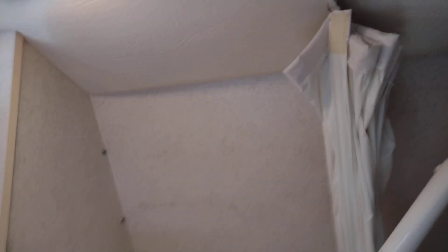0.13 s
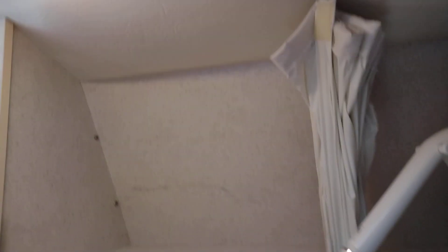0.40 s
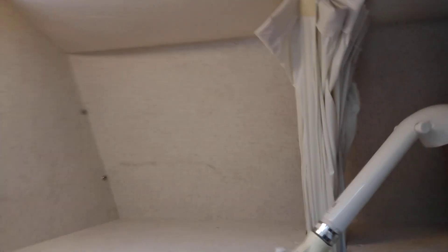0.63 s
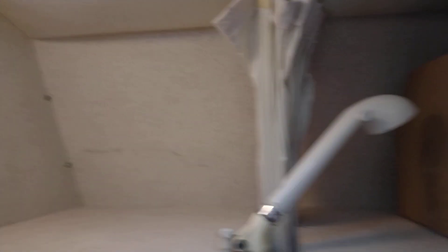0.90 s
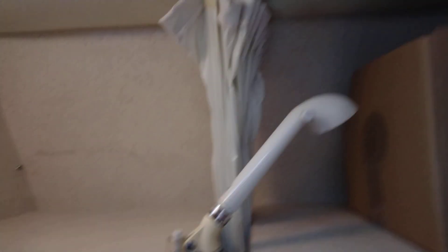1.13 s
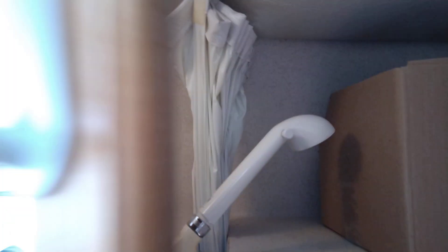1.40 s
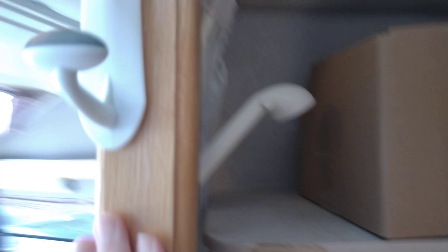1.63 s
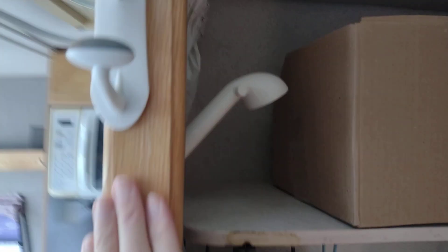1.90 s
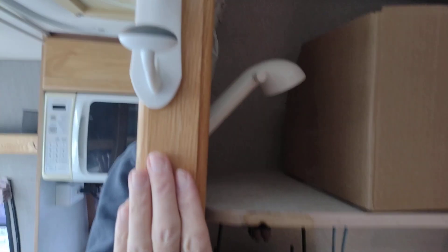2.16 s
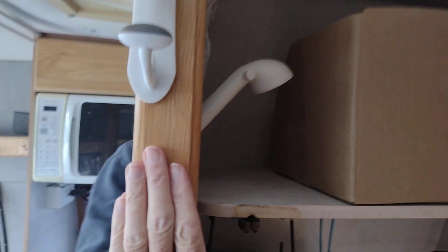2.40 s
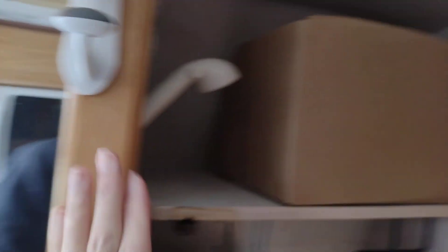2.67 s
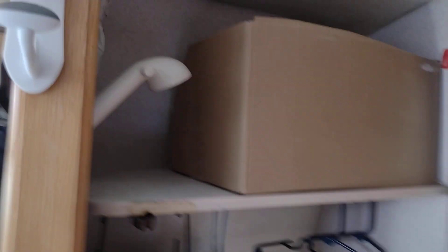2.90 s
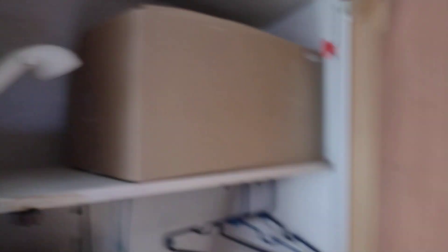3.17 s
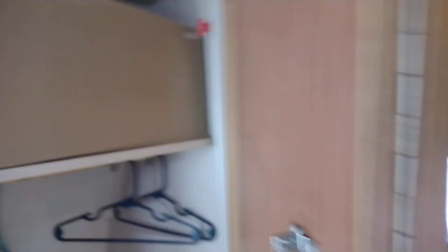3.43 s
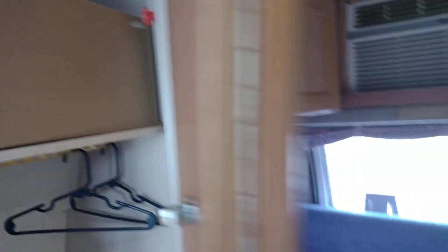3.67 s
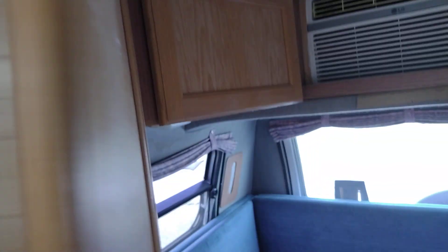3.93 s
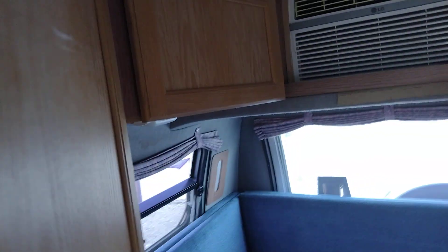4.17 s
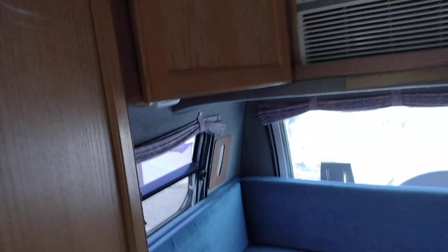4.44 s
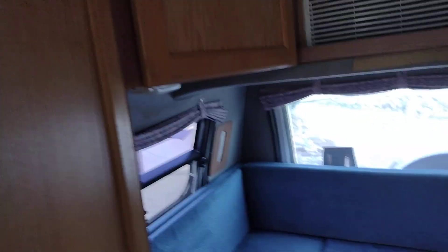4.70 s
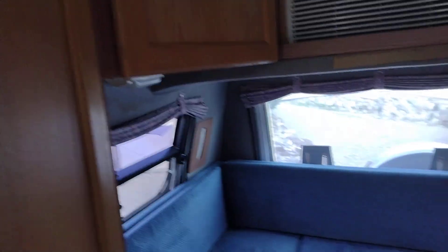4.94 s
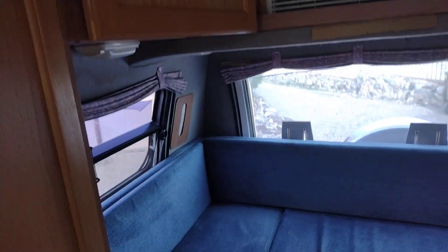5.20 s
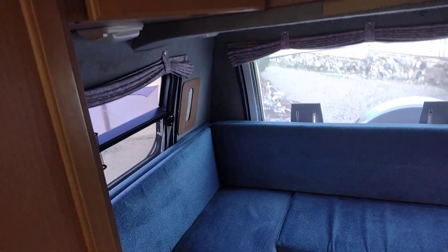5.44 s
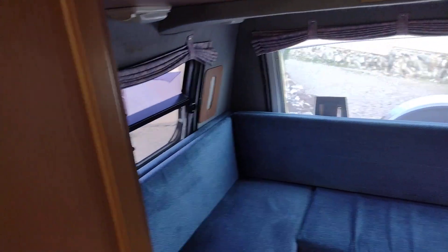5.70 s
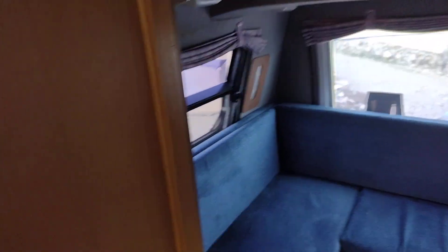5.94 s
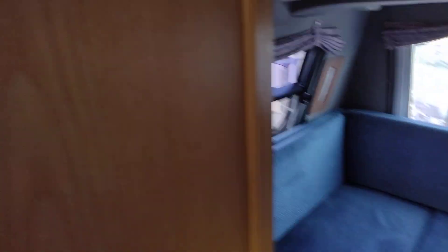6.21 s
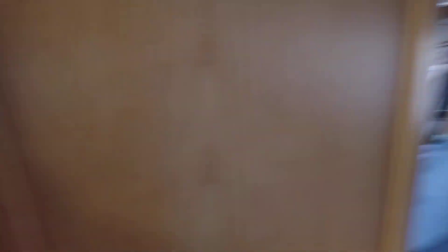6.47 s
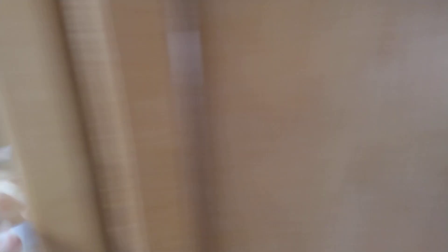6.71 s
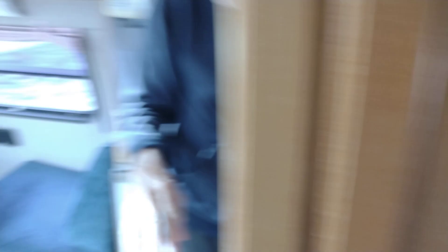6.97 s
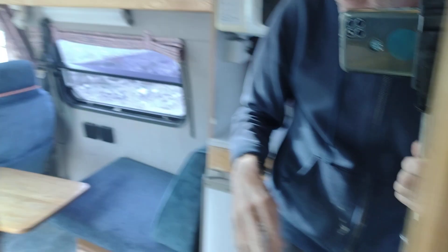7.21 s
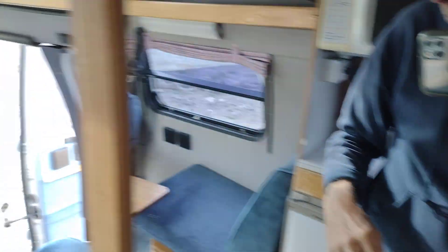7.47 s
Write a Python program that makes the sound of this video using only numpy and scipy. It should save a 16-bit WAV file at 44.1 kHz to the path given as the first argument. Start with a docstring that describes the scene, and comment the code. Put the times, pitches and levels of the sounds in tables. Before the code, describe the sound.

Hands work thin wooden cabinet doors at close range in a cramped, dry van interior. Scattered taps and scuffs build to a rattling slam, ease, and return as muted bumps with rustling cloth. A second hard knock with low thuds comes late, followed by smaller bumps and a soft swish. Finally only faint hiss, hum, small touches and rising bird whistles outside remain.

```python
"""Knocks on wooden cabinet doors, catches and hinges, close by, inside a small, soft-lined camper van.
Each knock rings the thin panels (decaying sines) and rattles loose fittings (bursts of coloured noise); low
thumps are swelling sines. Hands and sleeves rub and rustle as shaped noise, a door swishes past, and a faint
hum and the gliding whistles of a far bird fill the pauses.
Two spaced microphones hear it, the left one a little earlier."""
import sys
import numpy as np
from scipy import signal
from scipy.fft import rfft, irfft, next_fast_len
from scipy.io import wavfile
from scipy.ndimage import uniform_filter1d, map_coordinates

SR = 44100
rng = np.random.default_rng(int(sys.argv[2]) if len(sys.argv) > 2 else 0)


def undo_db(level):
    """Turn decibels back into plain size, where 20 dB means ten times bigger."""
    steps = np.asarray(level, float) / 20
    return 10 ** steps


def master(y):
    """Save y as 16-bit WAV."""
    cut = np.clip(np.atleast_2d(y).T, -1, 1)
    pcm = np.round(cut * 32767)  # scale
    wavfile.write(sys.argv[1], SR, pcm.astype(np.int16))


N = 335160

# Levels in these tables stand ahead of each source's own gain; density is the noise level per Hz.
# Background hiss and rumble: (frequency [Hz], density [dB])
FLOOR_COLOUR = [(22, -8.5), (40, 1.5), (200, -5.0), (2500, -20), (5000, -17.0), (16000, -54.5)]
# Faint hum, one list for each stretch where it shows: (time [s], level [dB])
HUM_SPANS = [
    [(5.25, -107), (5.314, -84), (5.584, -65), (5.59, -68)],
    [(6.75, -107), (6.776, -92.5), (6.836, -64.5), (6.998, -68), (7.05, -100), (7.12, -100), (7.145, -66),
     (7.544, -73), (7.6, -86.5)],
]
# Far bird, one row a whistle: (time [s], length [s], from [Hz], towards [Hz], level [dB])
CHIRPS = [(6.98, .075, 1800, 3320, -71), (7.104, .075, 2250, 4750, -67), (7.262, .055, 2150, 3800, -71)]
# Place of the close sources between the microphones: (time [s], right lag [ms], left over right in knocks [dB])
PLACE = [(0, 0.27, 1.5), (.5, .37, -3), (1.4, 0.5, 19.5), (1.5, 0.13, 0.5), (2.5, 0.11, -3), (3.2, 0.15, 3),
         (3.9, 0.25, 2), (4.1, 0.42, 4), (5.2, 0.47, 4), (5.6, .33, 2), (7.6, 0.23, 2.5)]
# Sleeves and hands on cloth: (crest time [s], level [dB], 20 dB rise [s], 20 dB fall [s],
# upper over lower half [dB]); very short or negative rises and falls take the least that stroke() allows
CLOTH_STROKES = [(0.0, -67.5, .02, 0.1, -7), (0.054, -63, -5, -7.6, -1), (0.414, -59, 0.25, -0.54, -15),
                 (0.548, -58.5, 0.35, -0.1, -7), (0.74, -63, 0.07, 0.5, -10), (0.809, -58, -0.05, 0.41, 1),
                 (0.962, -47.5, 0.03, -0.28, 1), (1.075, -60.5, 0.84, 0.2, -3), (1.208, -64, .1, .08, -5),
                 (1.37, -60, .28, .09, -3), (3.61, -60, 0.02, 0.17, -6), (3.66, -58.5, 0.11, -0.33, -10),
                 (3.906, -78.5, 0.86, 2.1, -14), (4.085, -52.5, 0.08, -0.06, 11.5),
                 (4.365, -65, 0.23, 0.2, 6.5), (4.505, -61.5, 0.03, 0.15, 11),
                 (4.655, -60.5, 0.2, -0.09, -4.5), (4.761, -66, -0.06, .09, 3.5),
                 (4.92, -57, 0.05, -0.09, 6), (5.091, -67.5, -0.47, 0.2, 9.5), (5.21, -65, 0.32, -0.34, 12),
                 (5.41, -83.5, 1.2, 0.65, 8.5), (5.63, -79, -0.7, 1.7, 3), (6.31, -77, -0.64, 0.1, 8),
                 (6.475, -64, 0.06, 0.22, 11), (6.619, -56.5, 0.05, 0.07, 6), (6.83, -63.5, -1.24, 0.04, 4),
                 (7.199, -84.5, 0.44, 0.6, 3.5)]
# Colour of the cloth: (frequency [Hz], density [dB])
CLOTH_COLOUR = [(1760, -10), (3000, -9.5), (4570, -6.5), (7750, -8.5), (8380, -4.5), (14000, -7),
                (15900, -13.5), (16500, -36)]
# Fingers sliding over wood: (crest time [s], level [dB], 20 dB rise [s], 20 dB fall [s], resonance [Hz])
SCUFF_STROKES = [(0.506, -46.5, .008, .012, 1330), (0.568, -51.5, .014, .05, 870),
                 (0.63, -62, .06, .1, 600), (0.71, -60, .12, .04, 400), (1.33, -71, .05, .1, 600),
                 (1.39, -67, .15, .2, 460), (5.58, -73, .09, .15, 900), (7.145, -68, .012, .17, 950)]
# Colour of the friction grains: (frequency [Hz], density [dB])
GRAIN_COLOUR = [(200, -9.5), (3000, -6.5)]
# A door swings past, rubbing softly: (time [s], level [dB])
SWING_SPANS = [
    [(6.328, -91), (6.44, -66.5), (6.678, -72), (6.704, -77), (6.814, -78), (6.83, -76), (6.916, -91)],
]
# Colour of the swinging door: (frequency [Hz], density [dB])
SWING_COLOUR = [(1500, -23), (2800, -11), (3370, 0.5), (3800, -6.5), (4300, -1.5), (4900, -9.5),
                (6200, -12.5), (7500, -29.5)]
# Changing level of handling, apart from blows: (time [s], creeping rumble [dB], wood rub [dB])
HANDLING = [(0.0, -47, -71), (0.17, -65, -67), (0.7, -83, -68.5), (1.08, -76, -116), (1.33, -80, -64.5),
            (1.65, -68, -109), (2.14, -47, -46.5), (2.54, -55.5, -76.5), (3.15, -66.5, -76),
            (3.28, -52, -81.5), (3.45, -77, -96), (3.77, -62.5, -68), (4.2, -47, -44), (4.36, -44.5, -64.5),
            (4.95, -61.5, -61.5), (5.14, -61.5, -81.5), (5.52, -102, -93), (5.64, -81, -73),
            (5.97, -60.5, -80.5), (6.39, -58.5, -67), (6.71, -74, -76), (6.92, -85, -100), (7.24, -93, -80),
            (7.41, -64.5, -89), (7.6, -64, -78.5)]
# Colour of the floor rumble: (frequency [Hz], density [dB])
RUMBLE_COLOUR = [(22, -20.5), (40, -4.5), (60, -1), (100, 4), (160, -6), (260, -11.5), (400, -28.5)]
# Colour of hands on wood: (frequency [Hz], density [dB])
RUB_COLOUR = [(150, -19), (300, 7), (600, -5), (1200, 0.5), (2200, -10), (3500, -18.5), (6000, -39.5)]
# Low thumps of doors and floor: (time [s], level [dB], pitch [Hz], 60 dB decay [s])
THUMPS = [(0.105, -51, 113, 0.18), (0.332, -46.5, 151.7, 0.4), (0.49, -43.5, 120, 0.083),
          (0.66, -62.5, 155, 0.36), (0.761, -33.5, 89, 0.16), (0.904, -45.5, 110, 0.15),
          (1.263, -55, 86, 0.092), (1.641, -42, 98, 0.17), (1.805, -37, 133, 0.25),
          (1.925, -46.5, 100, 0.75), (1.976, -32, 132, 0.31), (2.072, -35.5, 150, 0.25),
          (2.194, -16, 148, 0.18), (2.2, -26, 63, 0.48), (2.258, -22, 140.7, 0.21),
          (2.403, -30.5, 152.4, 0.29), (2.683, -22, 71, 0.21), (2.69, -29.5, 54.2, 0.19),
          (2.971, -55, 127, 0.13), (3.12, -39, 84.6, 0.21), (3.197, -40.5, 186.5, 0.22),
          (3.662, -43, 67.2, 0.3), (3.741, -40, 110, 0.25), (3.951, -48, 69.7, 0.32),
          (4.14, -36.5, 109.7, 0.51), (4.197, -33, 104, 0.15), (4.34, -36.5, 94.2, 0.34),
          (4.516, -31.5, 100.3, 0.28), (4.695, -28.5, 94.2, 0.27), (4.813, -22, 84.2, 0.061),
          (4.882, -31.5, 103.6, 0.24), (5.059, -34, 100.6, 0.18), (5.654, -26, 81, 0.21),
          (5.655, -27.5, 200, 0.28), (5.679, -26, 97.7, 0.46), (5.767, -19.5, 100.7, 0.14),
          (5.834, -36, 113.2, 0.25), (6.14, -43, 68.6, 0.46), (6.232, -38, 70.0, 0.14),
          (6.364, -25.5, 81.5, 0.059), (6.479, -46, 65.8, 0.1), (7.41, -54.5, 122, 0.14),
          (7.527, -51, 70.0, 0.21)]
# Knocks: (time [s], level [dB], upper-mid share [dB], treble share [dB], rattle's 60 dB decay [s])
KNOCKS = [(0.049, -41, 3.5, -20, 0.074), (0.101, -46.5, -15, -25.5, .21), (0.185, -45, 3.5, -26.5, .094),
          (0.239, -54, -36, -25, 0.13), (0.294, -29.5, -6, -9, 0.17), (0.324, -35, -18, -35, 0.2),
          (0.408, -37, -8, -17, 0.16), (0.563, -55.5, -9, -11.5, 0.23), (0.626, -52, -37, -41, 0.65),
          (0.751, -31, -12.5, -11, 0.19), (0.819, -39.5, -8.5, -21, 0.18), (0.905, -51.5, -4.5, -17, 0.36),
          (0.973, -47, -9.5, -10, .16), (1.049, -58, -11, -8.5, 0.32), (1.519, -55, 0, 4.5, 0.17),
          (1.605, -29.5, -8.5, -9.5, 0.23), (1.657, -31.5, -21, -24, 0.21), (1.687, -35.5, -18, -9, 0.079),
          (1.755, -29.5, -5, -6, 0.11), (1.819, -31.5, -15.5, -15.5, 0.17), (1.829, -34.5, -22, -41, 0.23),
          (1.906, -24, -10.5, -10.5, 0.33), (1.978, -26, -44, -51, 0.27), (2.058, -25, -4.5, -4.5, .19),
          (2.111, -22.5, -7.5, -34, 0.18), (2.14, -32, -25, -10, 0.06), (2.185, -25.5, -25, 6, 0.12),
          (2.194, -14, -5, -9.5, 0.22), (2.242, -17, -0.5, -6.5, 0.18), (2.283, -19.5, 0, -11, 0.18),
          (2.317, -23, -20, -11, .17), (2.403, -24.5, -12, -26.5, 0.095), (2.464, -30, -13, -43, 0.13),
          (2.513, -36, -12.5, -34, 0.11), (2.684, -54, -11.5, -28.5, 0.47), (2.726, -50, -14, -30.5, 0.31),
          (2.843, -42.5, -18, -45.5, .058), (2.977, -41.5, -29.5, -44, 0.17),
          (3.106, -38.5, -11, -53, 0.41), (3.136, -34, -11.5, -53, 0.27), (3.162, -35.5, -21.5, -55.5, .3),
          (3.197, -32, -9.5, -53.5, 0.11), (3.233, -40, -17.5, -48, 0.092), (3.456, -47.5, -10, -23, .31),
          (3.529, -52, -10.5, -19.5, .45), (3.557, -43.5, -6, -26, 0.51), (3.58, -37.5, -17, -23, 0.12),
          (3.654, -37, -10.5, -26.5, 0.27), (3.683, -28.5, -9.5, -37, 0.1), (3.718, -34, -3.5, -37.5, 0.11),
          (3.74, -30, -10, -39, 0.12), (3.886, -54, -7, -34, 0.21), (3.917, -42, -10, -32, 0.12),
          (4.056, -42.5, -7.5, -24, 0.54), (4.153, -25, -8.5, -36, 0.085), (4.169, -37, -11, -28.5, 0.17),
          (4.207, -32, -18, -36.5, 0.098), (4.263, -32, -12.5, -41, 0.11), (4.331, -21.5, -15, -54, 0.076),
          (4.423, -45.5, -11.5, -40, 0.22), (4.508, -19, -12, -43, 0.058), (4.601, -52, -8, -25, 0.28),
          (4.668, -35, -16, -25, 0.1), (4.69, -20.5, -9.5, -43, 0.075), (4.874, -24, -21.5, -38.5, 0.09),
          (5.059, -35.5, -57, -46, 0.056), (5.116, -48, -28, -21, 0.12), (5.649, -19.5, -3, -10.5, .085),
          (5.661, -13.5, -9, -18.5, 0.081), (5.693, -23.5, -12.5, -15.5, .16),
          (5.756, -24, -4.5, -28.5, 0.11), (5.817, -28, -9.5, -37.5, 0.12), (5.841, -34.5, -36, -34, 0.11),
          (5.869, -39.5, -16, -40.5, 0.19), (5.989, -41, -7, -53.5, 0.23), (6.073, -43.5, -13, -40.5, 0.25),
          (6.137, -30.5, -8, -55.5, 0.1), (6.168, -27, -6, -36.5, 0.1), (6.189, -35, -31, -40, 0.3),
          (6.23, -31.5, -11, -50, 0.092), (6.26, -35.5, -16.5, -34, 0.073), (6.365, -56.5, -32, -24, 0.17),
          (6.48, -57, -9, -17, 0.33), (7.322, -53.5, -13, -41, 0.098), (7.374, -50.5, -25.5, -45, 0.094),
          (7.52, -68.5, -11, -18, 0.16)]
# Modes of the thin door panels, swinging free: (frequency [Hz], level [dB], 60 dB decay [s])
PANEL_MODES = [(158, -8, 0.095), (200, -11, 0.17), (301.9, -10, 0.18), (381.3, -8.5, 0.027),
               (486.5, -4.5, 0.12), (570, -10.5, 0.09), (694.8, 0, 0.045), (900, -30, 0.027),
               (988, -0.5, 0.052), (1050, -6.5, 0.048), (1257, -1.5, .07), (1630, -2.5, 0.028),
               (1605, -3.5, 0.049), (2190, -13.5, 0.084), (1980, -17, 0.064), (2300, -14.5, 0.3),
               (2850, -8, 0.06), (3460, -13.5, 0.019), (4004, -16, 0.088)]
# Low and middle colour of the rattle after a knock: (frequency [Hz], density [dB])
BODY_COLOUR = [(180, -27), (330, -5), (500, 0.5), (1000, -6.5), (1600, -14), (2600, -35.5)]
# Upper-mid colour of the rattle: (frequency [Hz], density [dB])
EDGE_COLOUR = [(900, -18.5), (1500, -1), (2200, 4.5), (3200, -6), (4500, -21.5), (7000, -44)]
# Treble colour of the rattle: (frequency [Hz], density [dB])
CRACK_COLOUR = [(1760, -41), (3000, -6.5), (3060, -9.5), (5740, -7), (7210, -9), (10700, -9),
                (15900, -18.5), (16500, -38.5)]


def rms_one(x):
    """Scale to unit rms."""
    return x / np.sqrt(np.mean(x ** 2) + 1e-20)


def in_time(rows):
    """Columns of a curve, one value per sample."""
    s, *columns = np.transpose(rows)
    return [np.interp(np.arange(N) / SR, s, c) for c in columns]


def in_spans(spans, rest_db):
    """Level curve given in separate stretches, fading to rest in between."""
    level_db, t = np.full(N, float(rest_db)), np.arange(N) / SR
    for span in map(np.array, spans):
        inside = (t >= span[0, 0] - .015) & (t <= span[-1, 0] + .015)
        level_db[inside] = np.interp(t[inside], span[:, 0], span[:, 1])
    return uniform_filter1d(level_db, size=400)


def coloured(spectrum, alike, grain_db=0., modes_db=0., mode_hz=60.):
    """Stereo noise of a given spectrum, rms 1; grains make it lumpy, crowded small modes ripple its colour."""
    alike_under_hz = 266   # long waves reach both microphones alike
    grains = undo_db(grain_db * np.minimum(rng.exponential(1, (3, N)), 5))
    white = rfft(rng.standard_normal((3, N)) * grains)
    grid = np.fft.rfftfreq(N, 1 / SR)
    apart = (1 - np.clip(alike, 0, 1)) * grid ** 2 / (grid ** 2 + alike_under_hz ** 2)
    pair = np.sqrt(1 - apart) * white[0] + np.sqrt(apart) * white[1:]
    hz, db = np.transpose(spectrum)
    ripple_db = modes_db * np.interp(grid / mode_hz, np.arange(2000), rng.standard_normal(2000))
    colour_db = np.interp(np.log(grid + 1), np.log(hz), db, left=-90, right=-90)
    return rms_one(irfft(pair * undo_db(colour_db + ripple_db), N))


def flicker(rate_hz, depth_db):
    """Slow chance gain: noise through two equal low-pass poles, read as dB."""
    r = np.exp(-2 * np.pi * rate_hz / SR)
    slow = signal.lfilter([1], [1, -2 * r, r * r], rng.standard_normal(N + SR))[SR:]
    return undo_db(depth_db * rms_one(slow))


def ring(push, hz, t60):
    """A two-pole resonator: a unit click sets a sine of height 1 ringing."""
    r, w = undo_db(-60 / (max(t60, .01) * SR)), 2 * np.pi * hz / SR
    return signal.lfilter([0, np.sin(w)], [1, -2 * r * np.cos(w), r * r], push + 1e-18)


def sides(pan_db):
    """Left and right gains, pan_db apart."""
    return undo_db(np.array([pan_db / 2, -pan_db / 2]))


def stroke(s, db, rise_s, fall_s):
    """Gain of one stroke: it swells to a crest and fades."""
    crest_roundness = 1.3   # 1 is a pointed crest
    t = np.arange(N) / SR - s
    away = np.where(t < 0, -t / max(rise_s, .01), t / max(fall_s, .03))
    return undo_db(db - 20 * np.minimum(away, 8) ** crest_roundness)


def rattle(rows, share_db, t60_share, rise_s):
    """Energy envelope of some blows: a rise, then each one's own decay."""
    power, t = np.zeros(N + SR), np.arange(SR // 2) / SR
    for (s, db, *_, t60), extra_db in zip(rows, share_db):
        decay = undo_db(db + extra_db - 60 * t / max(t60 * t60_share, .01))
        start = round(s * SR)
        power[start:start + len(t)] += ((1 - np.exp(-t / rise_s)) * decay) ** 2
    return np.sqrt(power[:N])


def background():
    """A steady floor of noise, heaviest in the bass."""
    return undo_db(-89.5) * coloured(FLOOR_COLOUR, 0.25)


def hum():
    """A faint narrow hum in the pauses: a steady sine plus a noise-fed resonance at the same pitch."""
    hum_hz = 484.5
    push = rng.standard_normal((2, N)) + rng.standard_normal(N)   # partly shared by the microphones
    wobble = rms_one(ring(push, hum_hz, 0.4))
    steady = np.sqrt(2) * np.sin(2 * np.pi * hum_hz * np.arange(N) / SR)
    return undo_db(in_spans(HUM_SPANS, rest_db=-130)) * (0.21 * steady + 0.31 * wobble)


def bird():
    """Rising whistles outside; one strong reflection doubles them and a dense trail of echoes fills in."""
    glide_hz_per_s = 42000   # the climb starts at this rate and bends flat at its top
    echo_s, echo_db = .037, -5
    whistles = np.zeros(N)
    for s, length, from_hz, to_hz, db in CHIRPS:
        t, span_hz = np.arange(round(length * SR)) / SR, to_hz - from_hz
        climb = glide_hz_per_s * t / span_hz
        pitch_hz = from_hz + span_hz * climb / (1 + climb ** 4) ** .25
        phase = 2 * np.pi * np.cumsum(pitch_hz) / SR
        swell = np.sin(np.pi * (t / length) ** 0.43) ** .5   # early crest
        start = round(s * SR)
        whistles[start:start + len(t)] += undo_db(db) * swell * np.sin(phase)
    whistles *= flicker(150, 3.5)
    whistles += undo_db(echo_db) * np.roll(whistles, round(echo_s * SR))
    t = np.arange(SR // 3) / SR
    trail = undo_db(-24. - 60 * t / .3) * rng.standard_normal((2, len(t)))
    return whistles + signal.fftconvolve(whistles[None], trail, axes=1)[:, :N]


def van(x):
    """The small interior: six short feedback delays a side, duller on every round."""
    t60_s, wall_cut_hz = 0.16, 2600
    size = next_fast_len(N + SR)
    w = 2 * np.pi * np.fft.rfftfreq(size, 1 / SR)
    source, response = rfft(x, size), np.zeros((2, len(w)), complex)
    for k, lag in enumerate(rng.uniform(0.0079, 0.022, 12)):   # seconds
        dulling = 1 + 1j * w / (2 * np.pi * wall_cut_hz)
        loop = undo_db(-60 * lag / t60_s) / dulling * np.exp(-1j * w * lag)
        response[k % 2] += loop / (1 - loop) * (-1) ** (k // 2)
    return irfft(response * source, size)[:, :N]


def cloth():
    """Rustle whose upper half rises against the lower in the brighter strokes."""
    strokes = np.array([stroke(*row[:4]) ** 2 for row in CLOTH_STROKES])   # power
    bright_db = np.array(CLOTH_STROKES)[:, 4]
    rustle = coloured(CLOTH_COLOUR, 0.1, 1.5, modes_db=5.0, mode_hz=148.6) * flicker(40, 0.2)
    low = signal.sosfiltfilt(signal.butter(2, 7000, fs=SR, output="sos"), rustle)
    high = rustle - low
    return np.sqrt(undo_db(-bright_db) @ strokes) * low + np.sqrt(undo_db(bright_db) @ strokes) * high


def scuffs():
    """Friction grains in a broad resonance, its pitch set by the spot rubbed."""
    strokes = np.array([stroke(*row[:4]) ** 2 for row in SCUFF_STROKES])   # power
    centre_hz = np.array(SCUFF_STROKES)[:, 4]
    grains, out = coloured(GRAIN_COLOUR, .5, 3.5), 0
    for hz in np.geomspace(300, 2200, num=9):
        near = np.exp(-(np.log(hz / centre_hz) / .6) ** 2)   # each stroke favours the closest resonators
        out = out + np.sqrt(near ** 2 @ strokes) * rms_one(ring(grains, hz, 23.0 / hz))
    return undo_db(-5.5) * out


def swing():
    """A door swings past: a smooth hiss with two soft resonances."""
    return undo_db(in_spans(SWING_SPANS, rest_db=-110)) * coloured(SWING_COLOUR, 0.14)


def handling():
    """Rumble through the floor and hands on wood, each uneven, each stirred up by the blows."""
    rumble_db, rub_db = in_time(HANDLING)
    # after a blow the floor and the door keep shaking, longer than the blow itself
    floor = rattle(THUMPS, np.full(len(THUMPS), -7.5), t60_share=1.6, rise_s=0.01)
    door = rattle(KNOCKS, np.full(len(KNOCKS), -16), t60_share=1.6, rise_s=.02)
    door_to_floor = undo_db(3) * door   # the shaking door also drives the floor
    rumble_gain = np.sqrt(undo_db(2 * rumble_db) + floor ** 2 + door_to_floor ** 2)
    rumble = rumble_gain * coloured(RUMBLE_COLOUR, 0.15) * flicker(12, 3.0)
    wood = coloured(RUB_COLOUR, 0.12, 1.0, modes_db=2.0, mode_hz=70.)
    rub = np.hypot(undo_db(rub_db), door) * wood * flicker(5.7, 4.6)
    return rumble + rub


def thumps():
    """A soft push swells over about a cycle and rings low, with a weaker second panel mode."""
    out, t = np.zeros(N + SR), np.arange(SR // 2) / SR
    for s, db, hz, t60 in THUMPS:
        shape = (1 - np.exp(-t * hz / 1.5)) * undo_db(db + 3.5 - 60 * t / max(t60, .03))
        wave = np.sin(2 * np.pi * hz * t) + 0.36 * np.sin(2 * np.pi * 1.7 * hz * t)
        start = round(s * SR)
        out[start:start + len(t)] += shape * wave
    return out[:N]


def loose_fittings():
    """Loose wood and catches rattle after each blow as noise bursts, the treble dying first."""
    rows, out = np.array(KNOCKS), np.zeros((2, N))
    for first in range(4):   # knocks take turns among four noise colours, so the small modes vary
        turn = rows[first::4]
        body = coloured(BODY_COLOUR, 0.44, 2.0, modes_db=5., mode_hz=45.03)
        edge = coloured(EDGE_COLOUR, 0.2, 3.4, modes_db=5.0, mode_hz=81.0)
        crack = coloured(CRACK_COLOUR, 0.15, 2.5, modes_db=3.0, mode_hz=110.)
        out += undo_db(-4.5) * rattle(turn, 0 * turn[:, 1], 1.026, 0.0033) * body
        out += undo_db(1.0) * rattle(turn, turn[:, 2], 0.9, 0.0025) * edge
        out += undo_db(9.5) * rattle(turn, turn[:, 3], 0.54, 0.0029) * crack
    return out


def panels():
    """Each blow sets the modes of a thin door panel ringing, in chance strengths."""
    held_under_s, held_share = .095, 0.6   # short rattles mean a held door; its panels ring this share as long
    rows, out = np.array(KNOCKS), np.zeros(N)
    at = np.round(rows[:, 0] * SR).astype(int)
    strengths = rng.normal(0, 3.1, (len(rows), len(PANEL_MODES)))   # dB
    held = np.isin(np.arange(N), at[rows[:, 4] < held_under_s])
    for (hz, level_db, t60), strength_db in zip(PANEL_MODES, strengths.T):
        hardness_db = rows[:, 2] * np.clip((hz - 1000) / 1000, 0, 1)   # only hard contacts reach the high modes
        clicks = np.zeros(N)
        clicks[at] = undo_db(rows[:, 1] + level_db + hardness_db + strength_db - 6.0)
        contact = signal.butter(2, [hz / 1.62, hz * 1.6], "band", fs=SR)   # the push lasts about a cycle
        for struck, lasts in ((~held, 1), (held, held_share)):
            push = signal.lfilter(*contact, clicks * struck + 1e-18)
            out += ring(push, hz, t60 * lasts)
    return out


def knocks():
    """The main source: every blow rattles the loose fittings and rings the panels."""
    return loose_fittings() + panels()


def scene():
    """Close sources in the van reach the right microphone later; hum, bird and background lie behind."""
    late_ms, pan_db = in_time(PLACE)
    hits = knocks() * sides(pan_db)
    echo = undo_db(-14) * van(hits.mean(0))
    near = hits + thumps() + handling() + cloth() + scuffs() + swing() + echo
    heard_at = np.arange(N) - late_ms * SR / 1000
    right = map_coordinates(near[1], [heard_at], order=3, mode="nearest")
    return np.array([near[0], right]) + hum() + bird() + background()


def band_limit(x):
    """A steep low-pass at the top of the band."""
    return signal.sosfilt(signal.butter(12, 16800, fs=SR, output="sos"), x)


def record(dry):
    """The microphones drop the deepest bass and round the highest peaks."""
    without_bass = signal.sosfilt(signal.butter(2, 40, "high", fs=SR, output="sos"), dry)
    mix = 0.88 * np.tanh(without_bass / 0.88)
    return band_limit(mix)


dry = scene()
out = record(dry)
master(out)
```